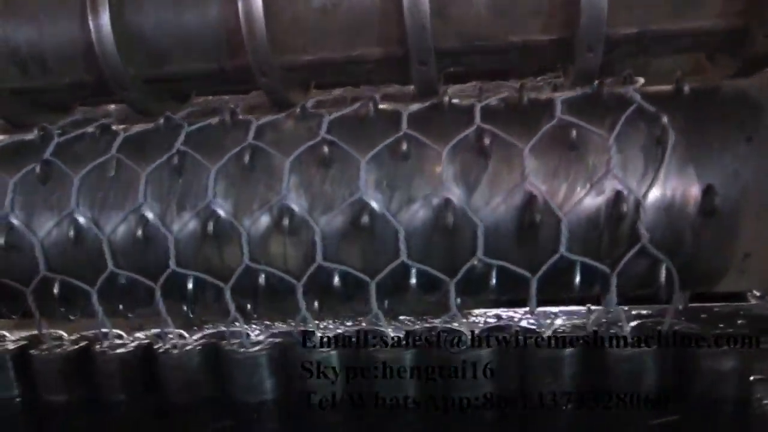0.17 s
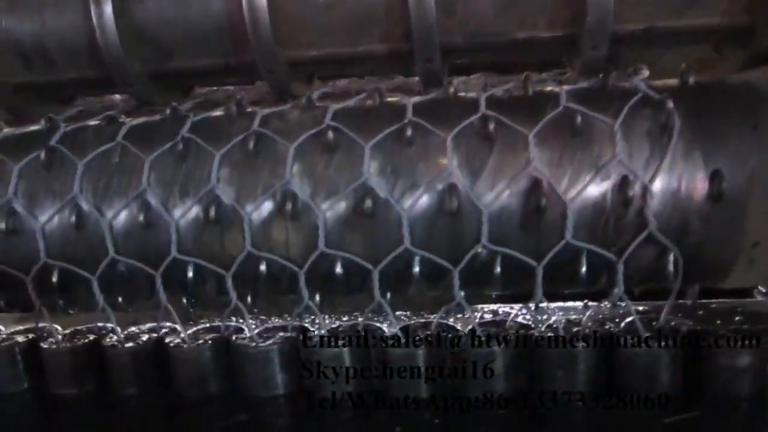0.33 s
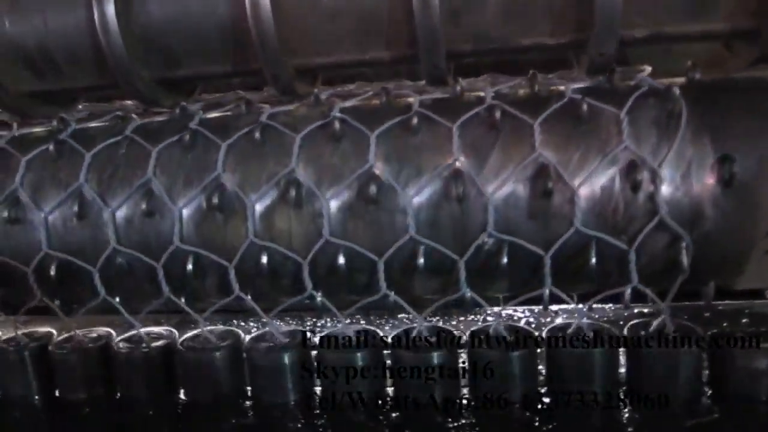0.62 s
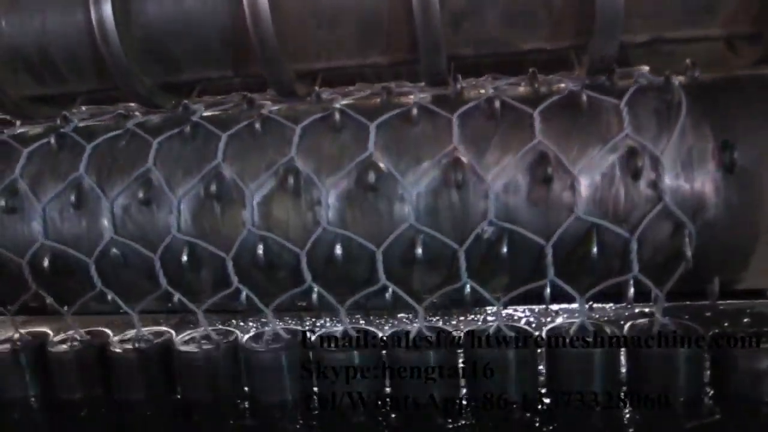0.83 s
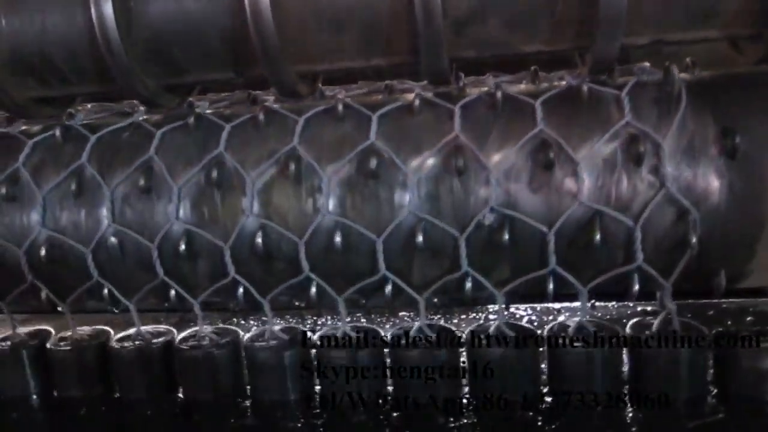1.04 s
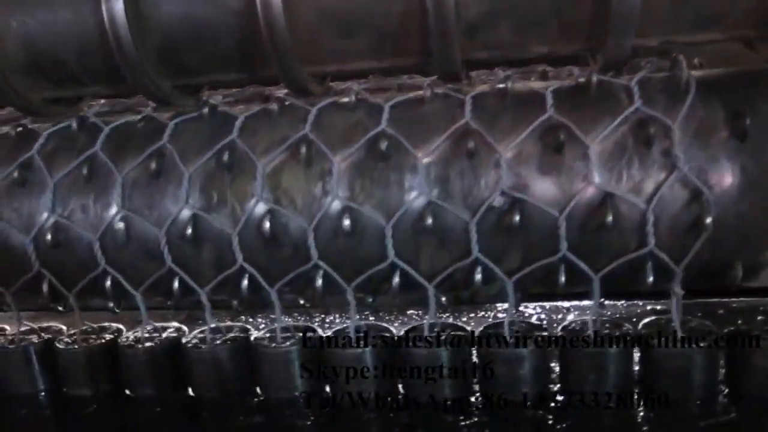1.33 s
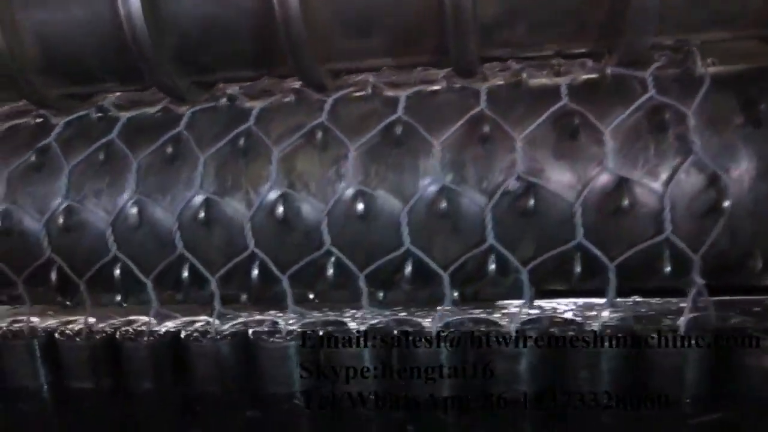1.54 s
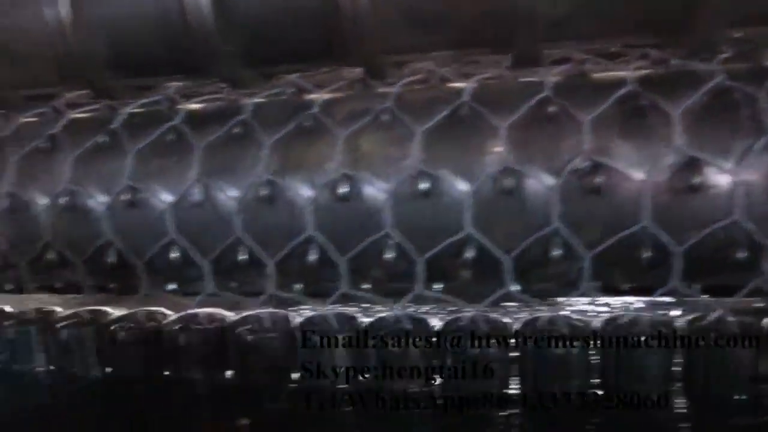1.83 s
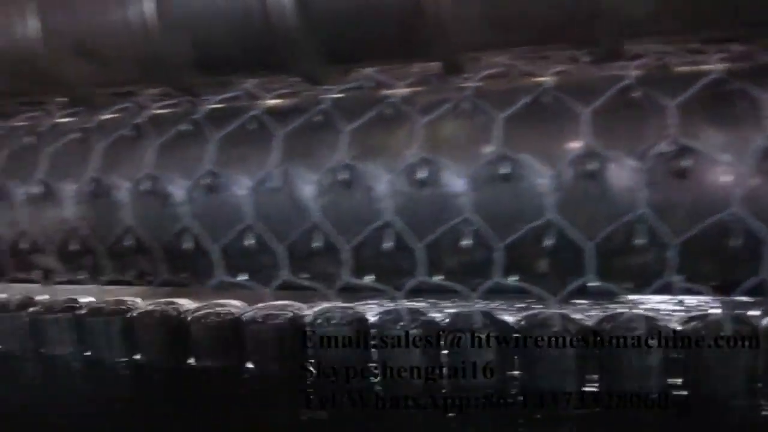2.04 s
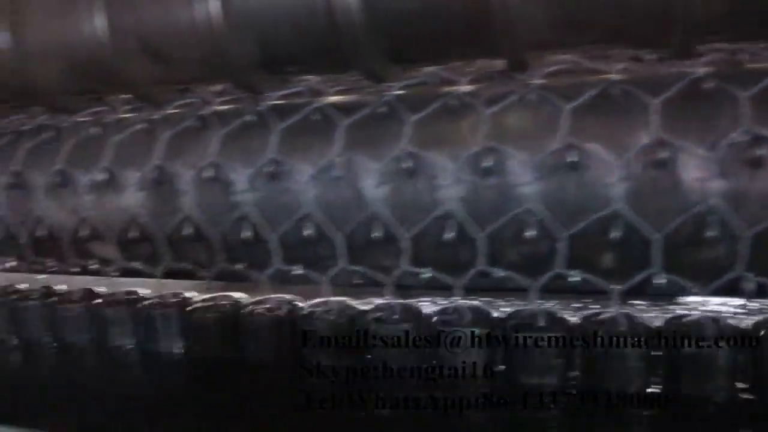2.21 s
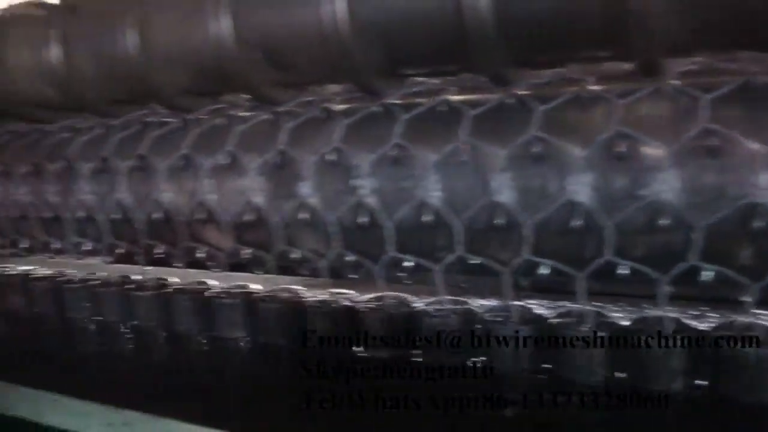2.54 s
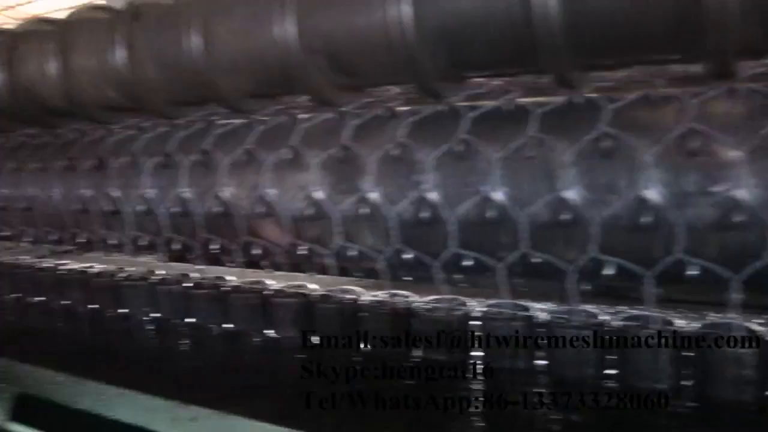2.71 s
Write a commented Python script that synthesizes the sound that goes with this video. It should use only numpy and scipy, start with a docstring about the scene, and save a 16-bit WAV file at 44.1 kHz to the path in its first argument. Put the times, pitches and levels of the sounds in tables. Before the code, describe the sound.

Loud clattering weaving machinery, heard close in a hall: a busy burst of clanks and shudders, a slight lull, then hard clanks and thumps again, over continuous gear rumble, loose ticking and thin wire hiss.

```python
"""Gears rumble and rattle under the stroke of a wire mesh weaving machine, close to a small stereo microphone.
Racks slide a row of steel spindles to and fro: noise and dense metal contacts swell with the load, loose
parts tick, and the row clanks and shudders as clusters of contacts that ring spindles, body and wire.
The factory hall answers through feedback delays; the frame thumps in dull noise bursts, rubbing steel
squeals in wandering sine tones, and a latch snaps as struck modes."""
import sys
import numpy as np
from scipy import signal
from scipy.io import wavfile

SR = 44100
rng = np.random.default_rng(int(sys.argv[2]) if len(sys.argv) > 2 else 0)


def elevation(decibels):
    """Turn decibel levels (scalar or array-like) into linear amplitude ratios."""
    levels = np.asarray(decibels, float)
    return 10 ** (levels / 20)


def unload_audio(sound):
    """Save the sound as a 16-bit wav file, at the path given as the first command line argument."""
    columns = np.transpose(np.atleast_2d(sound))
    # keep every value between -1 and 1, then stretch to whole-number steps
    steps = np.round(np.clip(columns, -1, 1) * 32767)
    wavfile.write(sys.argv[1], SR, steps.astype(np.int16))


N = 126567  # samples, 2.87 s

# effort of the stroke, as the level of the rattle: t/s, level/dB
STROKE_LOAD = [(0, -26.5), (.13, -28.5), (.2, -31), (.285, -35.5), (.31, -22.5), (.5, -25.5), (.65, -28),
               (.9, -27.5), (1.1, -33), (1.32, -38.5), (1.46, -29), (1.63, -34.5), (1.7, -19),
               (1.83, -26.5), (2.05, -24.5), (2.2, -25.5), (2.35, -32), (2.55, -38.5), (2.71, -34.5),
               (2.78, -29), (2.87, -25.5)]
# tone colours of rumble, gear rattle and wire sliding through guides: f/Hz, relative density level/dB
RUMBLE_COLOUR = [(12, -71), (20, -31), (87, -3.5), (200, -0.5), (390, -1), (458, -11), (2500, -23.5),
                 (3250, -19), (5500, -120)]
RATTLE_COLOUR = [(290, -51), (500, 1.5), (1600, -8.5), (4150, -9), (6190, -25), (8070, -18.5), (9000, -55),
                 (11700, -73), (19800, -120)]
HISS_COLOUR = [(5000, 5), (7000, -4.5), (10500, 0.5), (13000, -19.5), (15800, -1)]
RUMBLE_DB, RUMBLE_FOLLOWS = -30, 0.45  # level at mean load; share of the load's swing in dB
HISS_DB, HISS_FOLLOWS = -40, 0.47
RATTLE_PER_S, RATTLE_SPREAD_DB = 4000, -0.5

# loose steel ticking: level relative to the rattle, cycles until 60 dB down
TICKS_PER_S, TICK_DB, TICK_CYCLES = 320, -7, 60

# the row clanks all at once: t/s, level/dB, body level/dB and treble level/dB relative to it, hold/s
ROW_CLANKS = [(0.0955, -5, -20, -33, 0.0043), (0.109, -9.5, -7, -22, 0.012), (0.149, -17, -18, -23, .002),
              (0.2186, -17.5, 2.5, -42, 0.0021), (0.292, -7.5, -1, -16, 0.0083),
              (0.374, -4, -7, -17, 0.016), (0.455, -19, -40, -11, 0.0069), (0.659, -15.5, -2, -20, 0.0037),
              (0.887, -10.5, -10, -33, 0.0032), (1.09, -25.5, -3, -9, 0.0072), (1.348, -22, -13, -39, .008),
              (1.3674, -6.5, -6, -21, 0.015), (1.387, -4, -25, -28, 0.0054), (1.645, -5, -7.5, -21, 0.0049),
              (1.735, -5.5, -23, -19, 0.002), (1.7798, -6, -28, -16, 0.0041), (1.937, -16, -15, -14, 0.028),
              (1.972, -23.5, -2, -1, 0.0023), (2, -23.5, -8, -8, .004), (2.157, -13, -4.5, -6.5, 0.0046),
              (2.177, -19, -18, -9.5, 0.011), (2.589, -15.5, -5, -17.5, 0.0025),
              (2.616, -22.5, -18, -7.5, 0.01), (2.6336, -21.5, -17, -9, 0.022),
              (2.677, -33, -8, -1.5, 0.026), (2.756, -13, -11, -34, 0.008)]
# the row shudders, spindle after spindle: same columns
ROW_SHUDDERS = [(0.059, -23.5, -1, -55, 0.0067), (0.326, -5, -0.5, -34, 0.0058),
                (0.388, -7.5, -12, -22.5, 0.014), (0.518, -14, -2.5, -26, 0.026),
                (0.583, -20, -14, -16.5, 0.064), (0.696, -10, -5, -25, .006), (0.743, -18.5, 0, -11, 0.03),
                (0.789, -11, -3, -25, 0.0083), (0.853, -15.5, -4, -21, 0.018),
                (0.945, -20.5, -5, -21, 0.0099), (1.388, -2, -9, -21, 0.0036),
                (1.413, -6, -25, -25.5, 0.016), (1.685, -13, 7.5, -25, 0.01), (1.862, -18.5, -6, -24, 0.02),
                (2.015, -17.5, -6, -32, 0.021), (2.21, -15, -19, -15, 0.016),
                (2.72, -19.5, 1.5, -19, 0.017), (2.849, -12, -12, -27, 0.017)]
# ringing modes of the spindles: f/Hz, level/dB, t60/s (held within 0.004 to 0.022 s when rung)
SPINDLE_MODES = [(2590, -8.5, 0.045), (2937, -2, 0.015), (3180, -19, 0.025), (4070, 2, 0.0039),
                 (4694, 0.5, 0.0067), (5890, -8.5, 0.0027)]
# tone colours of the crack, the body and the jingling wire: f/Hz, relative density level/dB
CRACK_COLOUR = [(1500, -9), (3300, 7.5), (4600, -5.5), (5600, -3), (8000, -59.5)]
BODY_COLOUR = [(400, 0), (800, 4.5), (1400, 4), (2600, -5)]
WIRE_COLOUR = [(6000, -1), (7000, 2), (9000, 3.5), (10500, 2.5), (15800, -12)]
SPINDLE_DB, CRACK_DB, BODY_DB, WIRE_DB = -17.5, -12, -9.5, 1
CONTACTS_PER_S, CONTACT_SPREAD_DB = 9000, 2
CLANK_ATTACK_S, SHUDDER_ATTACK_S = 0.0003, 0.0077
CLANK_T60_S, BODY_T60_S, WIRE_T60_S = 0.041, 0.099, 0.027  # of a clank
SHUDDER_LINGERS = 2.28  # a shudder dies this many times slower than a clank

HALL_T60_S, HALL_DB, WALL_CUT_HZ, HALL_LOW_HZ = 0.27, -9, 10700, 895  # t60 before the walls dull it

# blows of the carriage into the frame: t/s, level/dB
FRAME_THUMPS = [(0.099, -11), (0.295, -15.5), (0.327, -10), (0.372, -11.5), (0.527, -22), (0.704, -16),
                (0.801, -17), (1.342, -7), (1.417, -11.5), (1.643, -24), (1.693, -7), (1.949, -13.5),
                (2.249, -32), (2.728, -14.5), (2.847, -15)]
# tone colour of a thump: f/Hz, relative density level/dB
THUMP_COLOUR = [(40, -13), (150, -1.5), (300, 2), (600, -10.5), (1500, -19)]
THUMP_ATTACK_S, THUMP_HOLD_S, THUMP_T60_S, THUMP_DB = 0.01, 0.019, 0.38, -12.5

# rubbing steel: start t/s, length/s, f/Hz, level/dB (rms), pitch wander/Hz
STEEL_SQUEALS = [(.12, .16, 6050, -48, 50), (.12, .06, 4200, -34, 60), (.58, .08, 4200, -34, 80),
                 (.59, .04, 6050, -39, 40), (.93, .15, 4080, -39, 70), (.94, .035, 4060, -30, 70),
                 (.935, .07, 6000, -43, 50), (1.1, .27, 3937, -43.5, 12), (1.138, .02, 2850, -32, 20),
                 (1.655, .035, 1350, -30, 40), (2.21, .04, 1250, -31, 30), (2.798, .018, 4900, -37, 40)]
SQUEAL_FADE_S, SQUEAL_FLICKER_DB = 0.008, 2.5

# the latch snaps home and bounces: t/s, level/dB
LATCH_HITS = [(.2927, -12), (.302, -16), (1.647, -15), (1.6525, -18), (2.158, -15), (2.164, -19)]
# ringing modes of the latch: f/Hz, level/dB, t60/s
LATCH_MODES = [(2800, -2, .04), (3050, -3, .04), (3350, 0, .04), (3720, -5, .04), (4620, -2, .045)]

# stereo image: f/Hz, left-right likeness (1 = identical)
STEREO_LIKENESS = [(100, 1), (380, .98), (700, 0.95), (1400, 0.78), (2800, 0.56), (6000, 0.019),
                   (15000, .05)]
# stereo balance: f/Hz, left minus right level/dB
STEREO_LEAN = [(300, 0), (700, -0.5), (1500, -2), (2800, -2.5), (5000, 0.2)]
NOTCH_HZ, NOTCH_WIDE_HZ, NOTCH_NARROW_HZ = 8246, 1830, 815  # centre and the two widths
TOP_HZ, OVERLOAD = 16100, 1.1  # top of the treble; ceiling of the rounded peaks


def rms_one(x):
    """Scale to an rms of 1."""
    return x / np.sqrt(np.mean(x ** 2) + 1e-20)


def at_hz(points, hz):
    """Read a table at a pitch, straight lines over log frequency."""
    table_hz, value = np.transpose(points)
    return np.interp(np.log(hz), np.log(table_hz), value)


def drift(rate_hz):
    """Slow random wander of rms 1: noise through two equal poles at rate_hz."""
    r = np.exp(-80 * np.pi * rate_hz / SR)  # made at every 40th sample
    noise = rng.standard_normal(N // 40 + 2002)
    slow = signal.lfilter([1], [1, -2 * r, r * r], noise)[2000:]
    return np.interp(np.arange(N) / 40, np.arange(len(slow)), rms_one(slow))


def grains(per_s, spread_db):
    """Two mid-side pairs of metal contacts at shared moments, with sizes of their own; rms 1."""
    moments = rng.random(N) < per_s / SR
    size_db = spread_db * np.minimum(rng.exponential(1, N), 5)
    return rms_one(moments * elevation(size_db) * rng.standard_normal((2, 2, N)))


def spread(mid_side, hz):
    """Left and right from mid and side, as alike and as balanced as the microphones hear that pitch."""
    alike = at_hz(STEREO_LIKENESS, hz)
    mid = np.sqrt(1 + alike) * mid_side[0]
    side = np.sqrt(1 - alike) * mid_side[1]
    pair = mid + side * [[1], [-1]]
    lean_db = at_hz(STEREO_LEAN, hz) / 2 * np.array([[1], [-1]])
    return pair * elevation(lean_db) / np.sqrt(2)


def coloured(trains, colour, patchy_db=0):
    """Shape by third-octave bands, each wandering by patchy_db; unit gain for steady white input."""
    out, power = 0, 0
    bottom, top = colour[0][0], colour[-1][0]
    edges = bottom * 2 ** np.arange(0, np.log2(top / bottom) + .01, 1 / 3)
    for k, (low, high) in enumerate(zip(edges, edges[1:])):
        centre = np.sqrt(low * high)
        band_pass = signal.butter(2, [low, high], "band", fs=SR, output="sos")
        band = signal.sosfilt(band_pass, trains[k % 2])  # neighbours use different trains
        gain = elevation(at_hz(colour, centre))
        power += gain ** 2 * (high - low) * 2 / SR
        wander = elevation(patchy_db * drift(2.66)) if patchy_db else 1
        out = out + gain * spread(band, centre) * wander
    return out / np.sqrt(power)


def resonance(x, hz, width_hz):
    """Two-pole ringing at one pitch, with unit gain for white noise."""
    r = np.exp(-np.pi * width_hz / SR)
    poles = [1, -2 * r * np.cos(2 * np.pi * hz / SR), r * r]
    return signal.lfilter([1, 0, -1], poles, x) * np.sqrt((1 - r * r) / 2)


def bursts(starts, dbs, holds, attacks, t60_s):
    """Attack, hold and exponential release for every blow, summed in power."""
    t, power = np.arange(N) / SR, np.full(N, 1e-18)
    for start, db, hold, attack, t60 in np.broadcast(starts, dbs, holds, attacks, t60_s):
        first = int(start * SR)
        u = t[first:first + SR // 2] - start  # each blow is over within half a second
        release_db = -60 * np.maximum(u - attack - hold, 0) / t60
        shape = np.clip(u / attack, 0, 1) * elevation(db + release_db)
        power[first:first + len(u)] += shape ** 2
    return np.sqrt(power)


def stroke_load_db():
    """Effort of the stroke over time, in dB."""
    return np.interp(np.arange(N) / SR, *np.transpose(STROKE_LOAD))


def rumble(swing_db):
    """Gears rumble as patchy low noise that partly follows the load."""
    noise = rng.standard_normal((2, 2, N))
    return elevation(RUMBLE_DB + RUMBLE_FOLLOWS * swing_db) * coloured(noise, RUMBLE_COLOUR, patchy_db=2.0)


def rattle(load_db):
    """Gears rattle as a dense train of metal contacts at the level of the load."""
    contacts = grains(RATTLE_PER_S, RATTLE_SPREAD_DB)
    return elevation(load_db) * coloured(contacts, RATTLE_COLOUR, patchy_db=2.2)


def wire_hiss(swing_db):
    """Wire sliding through guides hisses as treble noise that partly follows the load."""
    noise = rng.standard_normal((2, 2, N))
    return elevation(HISS_DB + HISS_FOLLOWS * swing_db) * coloured(noise, HISS_COLOUR, patchy_db=1.5)


def drive():
    """Rumble, gear rattle and wire hiss swell with the load."""
    load_db = stroke_load_db()
    swing_db = load_db - load_db.mean()
    return rumble(swing_db) + rattle(load_db) + wire_hiss(swing_db)


def ticks():
    """Small loose parts tick at random, each ringing briefly at one of sixteen pitches."""
    struck = (rng.random(N) < TICKS_PER_S / SR) * rng.standard_normal((2, N)) + 1e-18
    pitches = np.geomspace(1200, 4900, 16)
    dealt, out = rng.integers(0, len(pitches), N), 0
    for k, hz in enumerate(pitches):
        width_hz = np.log(1000) / np.pi * hz / TICK_CYCLES
        out = out + spread(resonance(struck * (dealt == k), hz, width_hz), hz)
    return elevation(stroke_load_db() + TICK_DB) * rms_one(out)


def clanks():
    """Each clank or shudder is a cluster of contacts: spindle modes, a crack, the body and the wire."""
    start, db, body_db, treble_db, hold = np.transpose(ROW_CLANKS + ROW_SHUDDERS)
    counts = [len(ROW_CLANKS), len(ROW_SHUDDERS)]
    attack = np.repeat([CLANK_ATTACK_S, SHUDDER_ATTACK_S], counts)
    lingers = np.repeat([1, SHUDDER_LINGERS], counts)
    contacts = grains(CONTACTS_PER_S, CONTACT_SPREAD_DB)

    def hit(level_db, t60_s):
        """The shared contacts under one burst per blow."""
        return contacts * bursts(start, level_db, hold, attack, t60_s * lingers)

    crack = elevation(CRACK_DB) * coloured(hit(db, CLANK_T60_S), CRACK_COLOUR)
    body = elevation(BODY_DB) * coloured(hit(db + body_db, BODY_T60_S), BODY_COLOUR)
    wire = elevation(WIRE_DB) * coloured(hit(db + treble_db, WIRE_T60_S), WIRE_COLOUR)
    out = crack + body + wire
    luck_db = rng.normal(0, 3.2, (len(start), len(SPINDLE_MODES)))  # each blow favours other modes
    for k, (hz, mode_db, t60) in enumerate(SPINDLE_MODES):
        width_hz = np.log(1000) / (np.pi * np.clip(t60, .004, .022))
        ring = resonance(hit(db + luck_db[:, k], CLANK_T60_S)[k % 2], hz, width_hz)
        out += elevation(SPINDLE_DB + mode_db) * spread(ring, hz)
    return out


def hall(x):
    """Six feedback delays a side return the sound, weaker and duller on every round."""
    out, dull = np.zeros((2, N)), np.exp(-2 * np.pi * WALL_CUT_HZ / SR)
    lags = (rng.uniform(.02, .05, 12) * SR).astype(int)
    for k, lag in enumerate(lags):
        gain = elevation(-60 * lag / SR / HALL_T60_S)
        loop, state = x.copy(), [0.]
        for i in range(lag, N, lag):  # one round at a time
            back, state = signal.lfilter([gain * (1 - dull)], [1, -dull], loop[i - lag:i], zi=state)
            loop[i:i + lag] += back[:N - i]
        out[k % 2] += (loop - x) * (-1) ** (k // 2)  # echoes only, in alternating sign
    return out


def thumps():
    """The carriage's weight goes into the frame as a dull swelling burst."""
    start, db = np.transpose(FRAME_THUMPS)
    swell = bursts(start, db, THUMP_HOLD_S, THUMP_ATTACK_S, THUMP_T60_S)
    push = rng.standard_normal((2, 2, N)) * swell
    return elevation(THUMP_DB) * coloured(push, THUMP_COLOUR)


def squeals():
    """Rubbing steel sings briefly, wandering in pitch and flickering in level."""
    t, out = np.arange(N) / SR, 0
    for start, length, hz, db, wander_hz in STEEL_SQUEALS:
        phase = 2 * np.pi * np.cumsum(hz + wander_hz * drift(120)) / SR
        tone = np.sqrt(2) * np.sin(phase + [[0], [1]])  # right leads by one radian
        gate = np.clip(np.minimum(t - start, start + length - t) / SQUEAL_FADE_S, 0, 1)
        out = out + elevation(db + SQUEAL_FLICKER_DB * drift(40)) * gate * tone
    return out


def latch():
    """Each snap rings the latch's modes with strengths and signs of its own."""
    start, db = np.transpose(LATCH_HITS)
    out, luck_db = 0, rng.normal(0, 1.55, (len(start), len(LATCH_MODES), 2))
    for k, (hz, mode_db, t60) in enumerate(LATCH_MODES):
        strength = elevation((db + mode_db)[:, None] + luck_db[:, k])
        clicks = np.full((2, N), 1e-18)
        clicks[:, (start * SR).astype(int)] = (np.sign(luck_db[:, k]) * strength).T
        r, w = elevation(-60 / (t60 * SR)), 2 * np.pi * hz / SR
        ring = signal.lfilter([0, np.sin(w)], [1, -2 * r * np.cos(w), r * r], clicks)
        out = out + spread(ring, hz)
    return out


def scene():
    """The machine, with the hall answering the bright part of clanks, latch and ticks."""
    machine = drive()
    blows = ticks() + clanks() + latch()
    high_pass = signal.butter(2, HALL_LOW_HZ, "high", fs=SR, output="sos")
    bright = signal.sosfilt(high_pass, blows.mean(axis=0))
    return machine + blows + elevation(HALL_DB) * hall(bright) + thumps() + squeals()


def top_cut(x):
    """Nothing passes above the cut-off."""
    return signal.sosfilt(signal.butter(12, 15760, fs=SR, output="sos"), x)


def record(dry):
    """The microphone ports cancel one narrow treble band, the top is cut and peaks are rounded."""
    x = dry
    for width_hz in (NOTCH_WIDE_HZ, NOTCH_NARROW_HZ):
        x = signal.lfilter(*signal.iirnotch(NOTCH_HZ, NOTCH_HZ / width_hz, fs=SR), x)
    x = signal.sosfilt(signal.cheby2(10, 60, TOP_HZ, fs=SR, output="sos"), x)
    mix = OVERLOAD * np.tanh(x / OVERLOAD)
    return top_cut(mix)


dry = scene()
out = record(dry)
unload_audio(out)
```